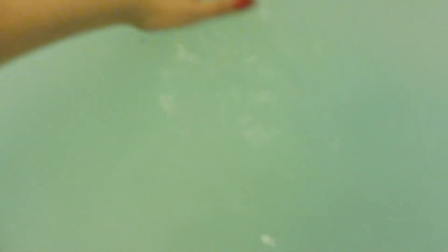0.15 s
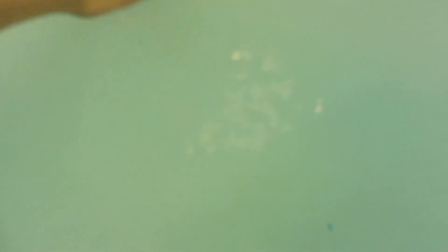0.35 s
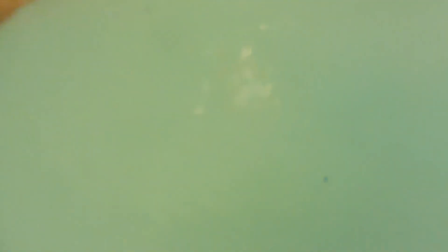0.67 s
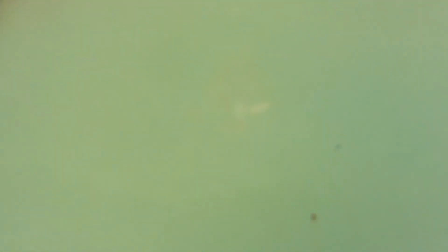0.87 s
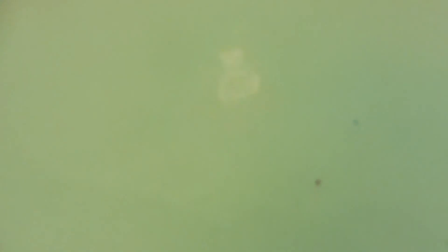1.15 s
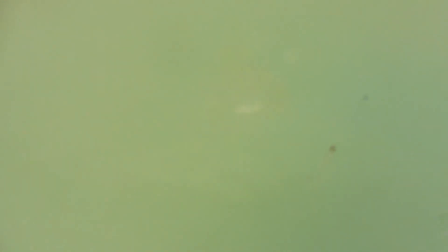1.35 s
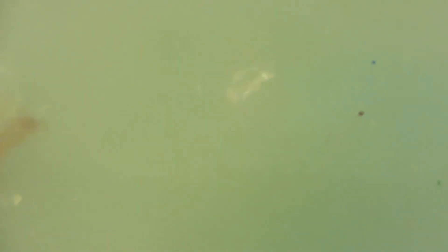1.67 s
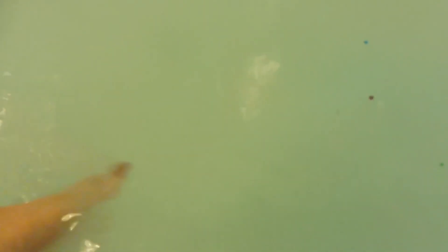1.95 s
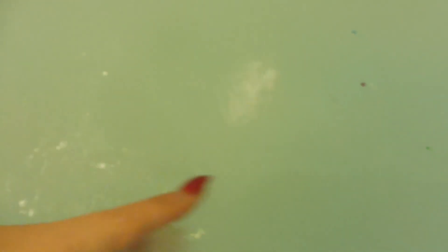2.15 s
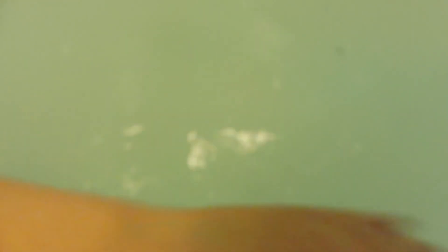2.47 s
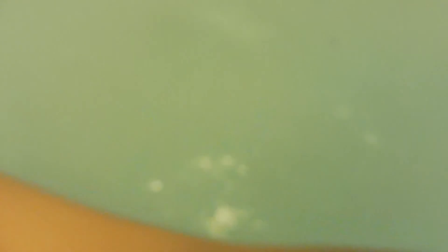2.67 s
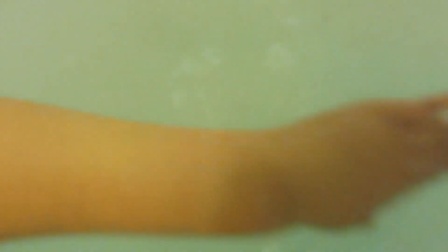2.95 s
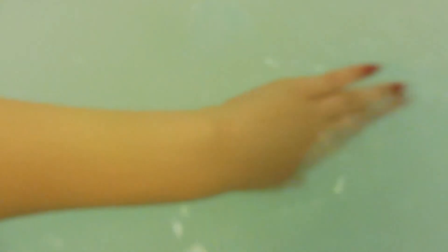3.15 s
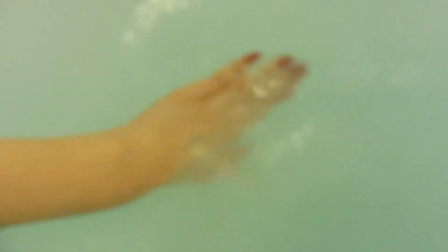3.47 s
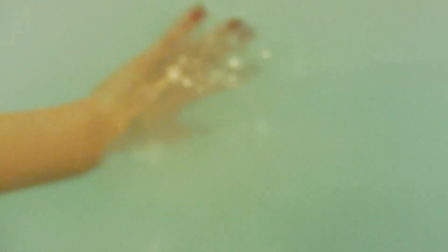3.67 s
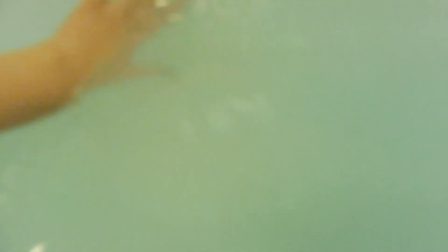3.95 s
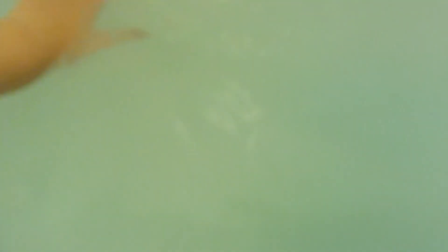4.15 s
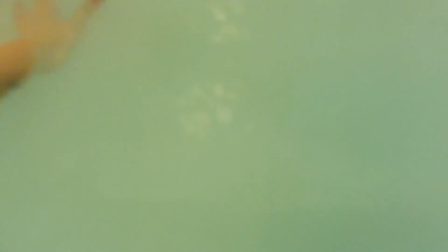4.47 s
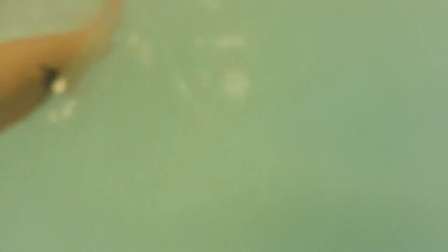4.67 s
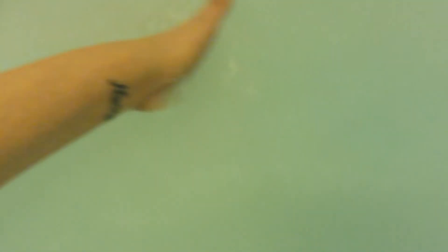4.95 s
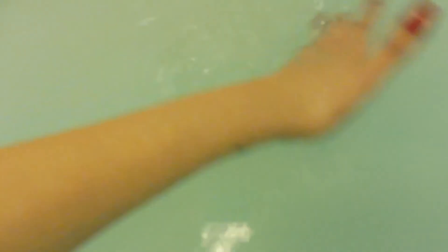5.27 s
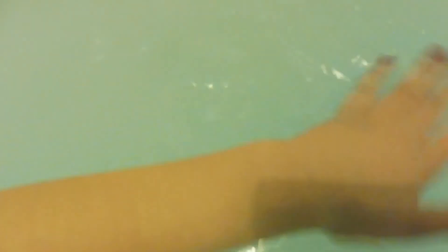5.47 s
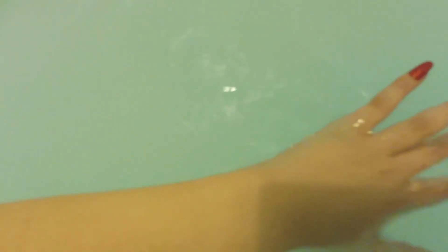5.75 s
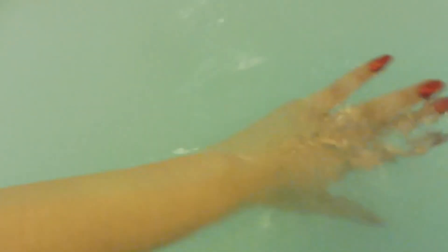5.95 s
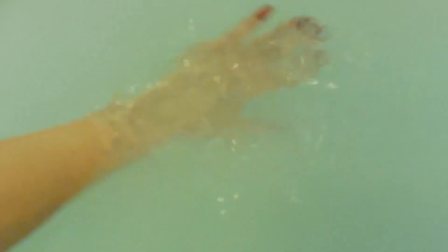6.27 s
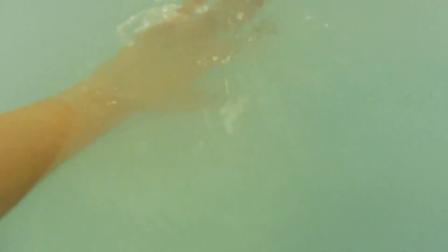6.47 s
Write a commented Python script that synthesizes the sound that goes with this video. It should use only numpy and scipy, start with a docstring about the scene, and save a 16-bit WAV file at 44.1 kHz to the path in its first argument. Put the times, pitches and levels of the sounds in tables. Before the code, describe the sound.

A hand is drawn slowly through a full bathtub, heard close up in a small tiled bathroom. At about 0.4 seconds there is a small splash of drips and plops, followed by a few faint bubbles. From 1.5 to 2 seconds the arm dips in with a soft splash, the loudest event, with deep gulps, bright bubbles and fine spray. A lighter swish with ticking drops comes from 2.8 to 3.2 seconds. After a lull with only faint bubbling, another gentle stroke plops around 4.9 seconds, trailed by a few tiny bubbles. Last small drips and a slight splash fall between 6 and 6.2 seconds. The tub and tiles give each sound a short, hollow ring. Underneath run a faint even hiss and a very quiet electrical hum and rumble, with a soft hollow rush that slowly grows and drops away at about 4.5 seconds.

```python
"""A small tiled bathroom, close on a full tub, in mono: a hand is drawn slowly through the water.
The arm dips in with one soft splash. Trapped air rings as bubbles, from deep gulps to fine spray,
drops tick on the surface, and the tub and tiles ring back.
Underneath sits a bed of faint hiss, a soft hollow rush, mains hum and low rumble."""
import sys
import numpy as np
from scipy import signal
from scipy.fft import rfft, irfft
from scipy.io import wavfile

SR = 44100
rng = np.random.default_rng(int(sys.argv[2]) if len(sys.argv) > 2 else 0)


def wav_record(signal):
    """Record a signal, one row per channel, as 16-bit PCM in the file named by sys.argv[1]."""
    frames = np.transpose(np.atleast_2d(signal))
    bounded = np.clip(frames, -1, 1)
    # unit amplitude maps onto the largest positive 16-bit level
    quanta = np.round(bounded * 32767).astype(np.int16)
    wavfile.write(sys.argv[1], SR, quanta)


N = 291661
T = np.arange(N) / SR


# pushes of the hand: crest t/s, rise/s, settle/s, small-bubble level/dB, spray level/dB
HAND_STROKES = [ (.37, .012, 0.063, -50, -57.5), (1.459, 0.023, 0.15, -51.5, -60),
                (1.629, 0.039, 0.047, -42.5, -57), (1.784, 0.046, 0.084, -39.5, -51),
                (1.919, 0.031, 0.043, -41.5, -52.5), (2.83, 0.069, .08, -53.5, -61.5),
                (2.96, 0.018, 0.06, -52.5, -65), (3.125, .02, 0.069, -66, -71),
                (4.6, .05, 0.07, -61.5, -78), (4.865, 0.079, .06, -52, -65),
                (4.94, 0.029, 0.046, -59.5, -64), (6.147, 0.013, 0.026, -50.5, -63)]

def hand_strokes(bubbles_db=-3.5, spray_db=2.5, spray_power=1.56):
    """Each push stirs up small bubbles and flings fine spray, which flies mostly at the crest."""
    stir, fling = 0, 0
    for crest_s, rise_s, settle_s, stir_db, fling_db in HAND_STROKES:
        push = swell(crest_s, rise_s, settle_s)
        stir += from_db(stir_db) * push
        fling += from_db(fling_db) * push ** spray_power
    bubbles = stir * swarm(per_s=600, low_hz=1300, high_hz=4200, cycles=6, tilt_db=-1.5)
    spray = fling * swarm(per_s=700, low_hz=4000, high_hz=13000, cycles=4, tilt_db=1.5)
    return from_db(bubbles_db) * bubbles + from_db(spray_db) * spray


# large air pockets folding in: crest t/s, rise/s, settle/s, level/dB
AIR_FOLDS = [(1.63, 0.087, .1, -52.5), (1.778, 0.033, 0.032, -43), (1.9, 0.031, 0.074, -44)]

def arm_dip(gulp_db=-2.5, heave_db=-19.5):
    """The body of the splash: big pockets gulp shut and water heaves aside as the arm goes under."""
    folding = sum(swell(*fold) for fold in AIR_FOLDS)
    gulps = folding * swarm(per_s=300, low_hz=620, high_hz=1400, cycles=5, tilt_db=3)
    heave = folding * rms_one(band(rng.standard_normal(N), 244, 390))
    return from_db(gulp_db) * gulps + from_db(heave_db) * heave + glugs(folding)


def glugs(folding, count=6, start_s=1.634, end_s=1.803, first_hz=429, last_hz=573, gain_db=10.5):
    """The deepest pockets go in an uneven run, each smaller and higher, as loud as the water folds in."""
    out = np.zeros(N)
    times = np.linspace(start_s, end_s, count) + rng.normal(0, 0.00304, count)
    for s, hz in zip(times, np.geomspace(first_hz, last_hz, count)):
        add(out, s, np.interp(s, T, folding) * bubble(hz, bubble_decay(hz)))
    return from_db(gain_db) * out


# foreground air pockets ringing under the surface: t/s, f/Hz, level/dB
CLEAR_BUBBLES = [ (.3633, 3330, -39), (0.3782, 950, -36), (0.393, 1970, -39), (.428, 320, -46),
                 (.7183, 3040, -47.5), (0.7663, 2100, -45.5), (.987, 4620, -46), (1.452, 1596, -35.5),
                 (1.463, 1540, -40), (1.535, 1520, -36), (1.544, 3470, -37), (1.583, 747, -47),
                 (1.5958, 1883, -21.5), (1.603, 3050, -32.5), (1.631, 1870, -35), (1.716, 2440, -32.5),
                 (1.746, 1045, -36), (1.7653, 556, -33), (1.7763, 585, -37.5), (1.7825, 1410, -31),
                 (1.7928, 1706, -30.5), (1.8208, 3290, -32), (1.8496, 2250, -29), (1.861, 2650, -36),
                 (1.878, 725, -35.5), (1.9, 1230, -27.5), (1.9235, 1750, -27), (1.928, 575, -37.5),
                 (2.005, 1980, -39), (2.024, 1960, -42), (2.142, 7250, -38), (2.774, 1028, -40.5),
                 (2.799, 3800, -42.5), (2.839, 1034, -40), (2.914, 1730, -35.5), (2.989, 1510, -45),
                 (3.0807, 2580, -41), (3.101, 2900, -40.5), (3.1255, 4450, -40.5), (3.7437, 4450, -47),
                 (4.815, 840, -41.5), (4.853, 1760, -42.5), (4.864, 1480, -40), (4.916, 2210, -42.5),
                 (4.929, 1060, -30), (4.935, 2855, -36.5), (4.9464, 1102, -34), (4.962, 1130, -36.5),
                 (5.189, 2410, -43), (5.211, 2640, -46.5), (5.3305, 3530, -43.5), (5.6167, 2370, -44.5),
                 (6.140, 1080, -40.5), (6.1435, 1380, -39.5), (6.223, 1670, -42)]

def plops(trim_db=-0.5, smack_db=-16.0):
    """Single bubbles that cut through, each with a little wet smack as it closes."""
    out = np.zeros(N)
    for s, hz, db in CLEAR_BUBBLES:
        gain, decay_s = from_db(db + trim_db), bubble_decay(hz)
        add(out, s, gain * bubble(hz, decay_s))
        add(out, s, gain * from_db(smack_db) * smack(hz, decay_s))
    return out


# drops landing and films snapping on the surface: t/s, f/Hz, ring level/dB, snap level/dB
SURFACE_DROPS = [ (0.327, 6700, -42, -36), (0.3499, 2960, -30.5, -40), (.367, 4600, -39, -42),
                 (1.622, 5500, -38, -42), (1.908, 3620, -27.5, -42), (1.9119, 2000, -22.5, -32),
                 (1.997, 4600, -53, -35), (2.828, 4420, -35.5, -38), (2.9129, 3140, -34, -29),
                 (2.914, 6500, -31.5, -44), (2.97, 1500, -39, -49), (3.080, 3350, -32.5, -32.5),
                 (3.118, 1830, -40.5, -50), (3.1508, 6450, -38, -48), (3.1975, 6730, -42, -39.5),
                 (4.929, 4350, -35.5, -50), (5.9601, 3220, -34.5, -42), (6.0007, 5570, -42.5, -45),
                 (6.0348, 2680, -45.5, -52)]

def drops(snap_s=0.00079, ring_cycles=5.4, smack_db=-3.5):
    """A sharp snap of the surface for attack, with the smack and short ring of a tiny cavity."""
    rings, snaps = np.zeros(N), np.zeros(N)
    snap_fade = np.exp(-T[:SR // 100] / snap_s)
    for s, hz, ring_db, snap_db in SURFACE_DROPS:
        decay_s = ring_cycles / hz
        add(rings, s, from_db(ring_db) * bubble(hz, decay_s))
        add(rings, s, from_db(ring_db + smack_db) * smack(hz, decay_s, spread=1.324))
        add(snaps, s, from_db(snap_db) * rng.standard_normal(len(snap_fade)) * snap_fade)
    return rings + band(snaps, 3200, 11700)


def ripples():
    """A soft bubbling between strokes: the surface rocks most after the big ones, then calms."""
    rocking = swell(crest_s=2.5, rise_s=5, settle_s=3.5, db=-68.5)
    return rocking * swarm(per_s=700, low_hz=1250, high_hz=2600, cycles=7, tilt_db=-4)


def bubble(hz, decay_s, rise=0.01, onset_cycles=0.34):
    """A pocket of air pinches off and rings; its pitch climbs as it nears the surface."""
    t = np.arange(int(6 * decay_s * SR) + 2) / SR
    pitch = hz * (1 + rise * t / decay_s)
    attack = 1 - np.exp(-t * hz / onset_cycles)
    return np.sin(2 * np.pi * np.cumsum(pitch) / SR) * attack * np.exp(-t / decay_s)


def bubble_decay(hz):
    """Seconds for a bubble to fall to 1/e: small, high ones die sooner."""
    return 0.007 * (1000 / hz) ** 0.75


def swarm(per_s, low_hz, high_hz, cycles, tilt_db):
    """A texture of bubbles of random size and timing, tilted by tilt_db an octave; rms 1."""
    out = np.zeros(N)
    for when, pitch, size, damping in rng.random((int(per_s * N / SR), 4)):
        hz = low_hz * (high_hz / low_hz) ** pitch
        size_db = 3.5 * min(-np.log(1 - size), 3)   # many quiet, a few loud
        gain = from_db(size_db + tilt_db * np.log2(hz / low_hz))
        decay_s = cycles * (.5 + damping) / hz
        add(out, when * N / SR, gain * bubble(hz, decay_s, rise=0.028))
    return rms_one(out)


def smack(hz, decay_s, spread=1.3):
    """Water slapping shut: a short noise burst in a band around the pitch of the cavity."""
    t = T[:SR // 20]
    burst = rng.standard_normal(len(t)) * np.exp(-t / decay_s)
    for _ in range(2):   # two passes for steeper edges
        burst = band(burst, hz / spread, hz * spread)
    return burst * np.sqrt(decay_s * SR / 2 / np.sum(burst ** 2))


# decay of the tiles' tail: f/Hz, t60/s
TILE_DECAY = [(250, 0.5), (1000, 0.3), (3000, 0.59), (10000, 0.26)]
# tone of the tiles' tail: f/Hz, level/dB
TILE_TONE = [(250, -1.5), (1000, -3), (3000, -8), (10000, -2.5)]
# early slaps off the near walls: delay t/s, level/dB
WALL_SLAPS = [(.0031, -14), (.0074, -14.5), (0.0134, -15), (0.018, -16)]
# air modes between the tub walls and the water: f/Hz, level/dB, t60/s
TUB_RING = [(484, 4.5, 0.44), (561, 5.5, 0.44), (672, -6, 0.57), (737, 8.5, 0.42), (1010, 11.5, 0.6)]

def bathroom(dry, build_s=0.0031):
    """Direct sound, slaps off the near walls, a dense tail from the tiles and the ring of the tub."""
    t = T[:SR]
    response = np.zeros(SR)
    build = 1 - np.exp(-(t / build_s) ** 2)
    edges_hz = np.geomspace(150, 16000, 10)
    for low, high in zip(edges_hz, edges_hz[1:]):
        hz = np.sqrt(low * high)
        fade = build * from_db(-60 * t / at_hz(TILE_DECAY, hz))
        tail = band(rng.standard_normal(SR), low, high) * fade / np.sqrt(np.sum(fade ** 2))
        response += from_db(at_hz(TILE_TONE, hz)) * tail
    for delay_s, db in WALL_SLAPS:
        response[int(delay_s * SR)] += from_db(db)
    for hz, db, t60 in TUB_RING:
        fade = from_db(-60 * t / t60)
        response += from_db(db) * 2 * np.cos(2 * np.pi * hz * t) * fade / fade.sum()
    response[0] += 1   # direct sound
    return signal.fftconvolve(dry, response)[:N]


# tone of the noise bed: f/Hz, relative level/dB
HISS_TONE = [(25, -12.5), (65, -6), (150, -2.5), (300, 0), (700, -1.5), (1100, 2), (1250, -9.5), (2300, -9),
             (3600, -13), (6200, -14), (9000, -15), (12500, -17)]
# bright bands on top of it: f/Hz, width/Hz, relative level/dB
HISS_BANDS = [(5035, 610, -4), (7610, 1000, -6.5)]

def hiss(level_db=-57.0):
    """A faint, even hiss with two narrow bands standing out in the treble."""
    hz = np.arange(N // 2 + 1) * SR / N
    power = from_db(at_hz(HISS_TONE, hz)) ** 2
    for centre, width, db in HISS_BANDS:
        detune = 2 * (hz - centre) / width
        power += from_db(db) ** 2 / (1 + detune ** 2) ** 1.37
    spectrum = rfft(rng.standard_normal(N)) * np.sqrt(power)
    return from_db(level_db) * rms_one(irfft(spectrum, N))


def rush():
    """A hollow note of noise near 1 kHz swells slowly, once, and falls away fast."""
    hollow = rms_one(band(rng.standard_normal(N), 1005, 1105))
    return swell(crest_s=4.5, rise_s=3, settle_s=0.1, db=-60) * hollow


def mains_hum(hz=102.2, rms_db=-73.5):
    """The mains hum as one low, steady tone."""
    return from_db(rms_db) * np.sqrt(2) * np.sin(2 * np.pi * hz * T)


def rumble(start_db=-73.5, fade_db_per_s=2):
    """Faint deep noise below the hum, slowly fading away."""
    return from_db(start_db - fade_db_per_s * T) * rms_one(band(rng.standard_normal(N), 22, 84))


def swell(crest_s, rise_s, settle_s, db=0):
    """A gain that grows to a crest and dies away, both exponentially."""
    away = np.where(T < crest_s, (crest_s - T) / rise_s, (T - crest_s) / settle_s)
    return from_db(db) * np.exp(-np.minimum(away, 20))


def from_db(db):
    return 10 ** (np.asarray(db) / 20)


def rms_one(x):
    return x / np.sqrt(np.mean(x ** 2) + 1e-20)


def at_hz(points, hz):
    """Reads a table on a log-frequency axis."""
    points = np.array(points)
    return np.interp(np.log(np.maximum(hz, 1)), np.log(points[:, 0]), points[:, 1])


def band(x, low_hz, high_hz):
    return signal.sosfilt(signal.butter(2, [low_hz, high_hz], "band", fs=SR, output="sos"), x)


def add(track, s, sound):
    """Lays a sound into a track at time s."""
    i = max(int(s * SR), 0)
    track[i:i + len(sound)] += sound[:max(N - i, 0)]


def scene():
    """Water in the room over the background bed, the same in both channels."""
    water = plops() + drops() + arm_dip() + hand_strokes() + ripples()
    mono = bathroom(water) + hiss() + rush() + mains_hum() + rumble()
    return np.array([mono, mono])


def record(dry, notch_hz=1232, notch_q=28, cutoff_hz=12500):
    """The microphone's port swallows one narrow band; the top is cut steeply."""
    notched = signal.lfilter(*signal.iirnotch(notch_hz, notch_q, fs=SR), dry)
    return signal.sosfilt(signal.ellip(10, .2, 70, cutoff_hz, fs=SR, output="sos"), notched)


dry = scene()
out = record(dry)
wav_record(out)
```